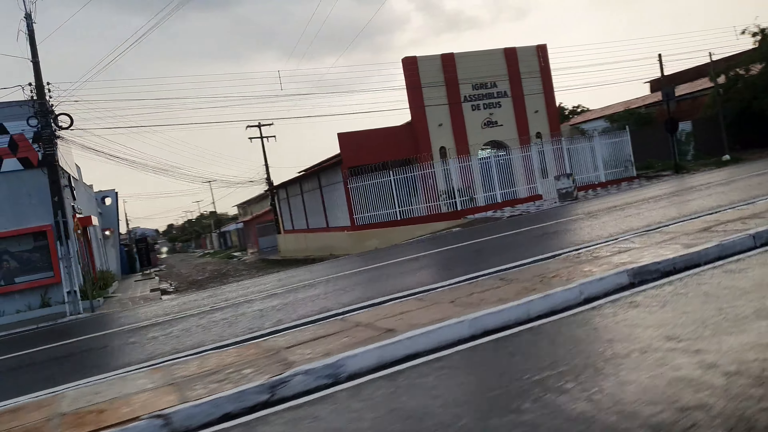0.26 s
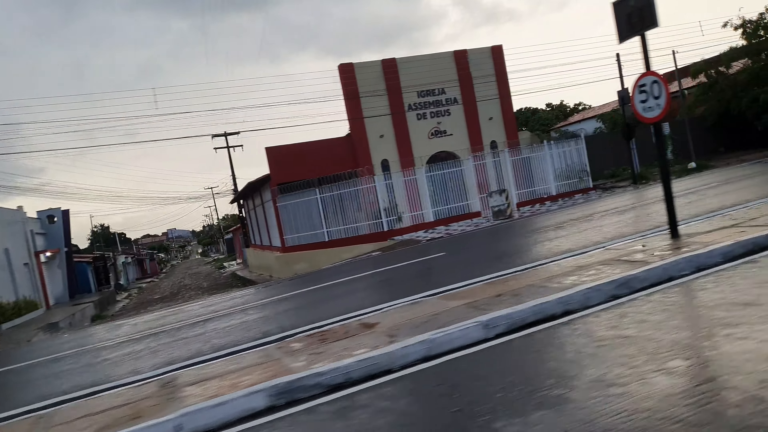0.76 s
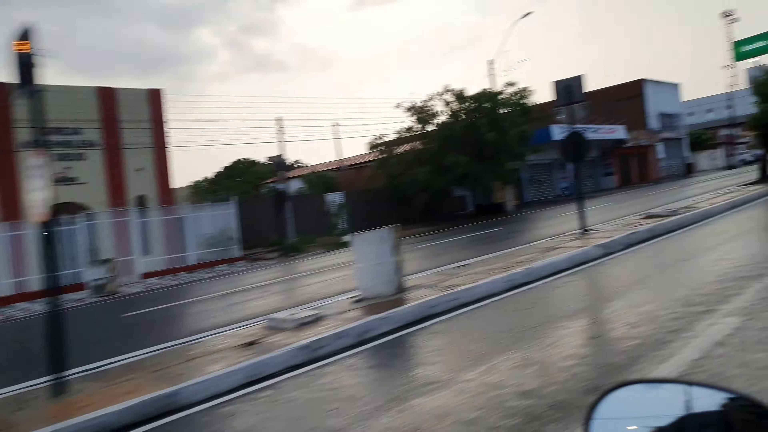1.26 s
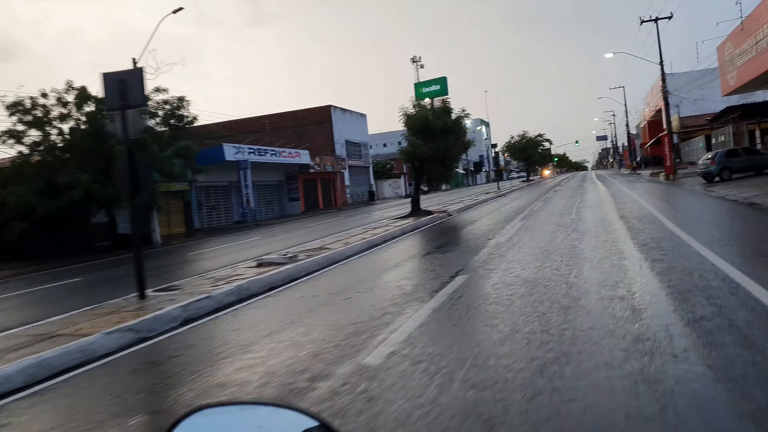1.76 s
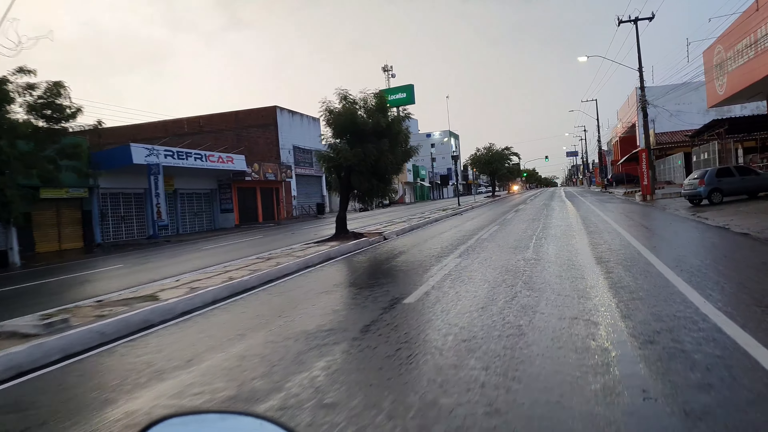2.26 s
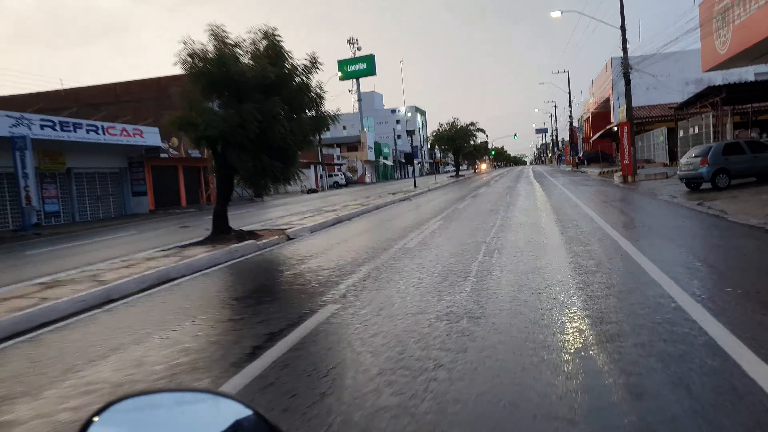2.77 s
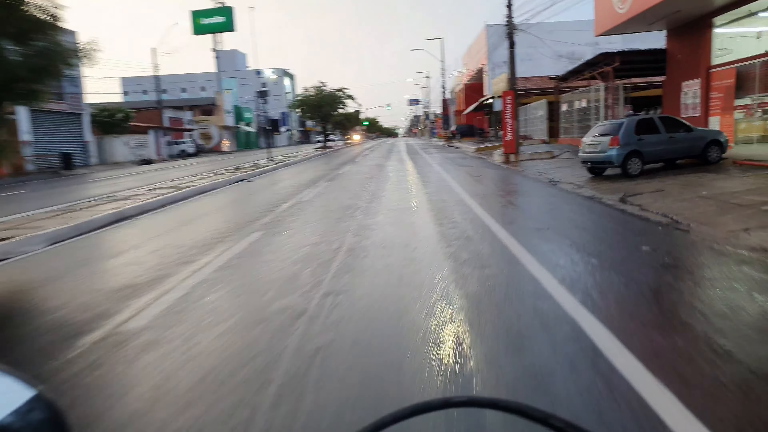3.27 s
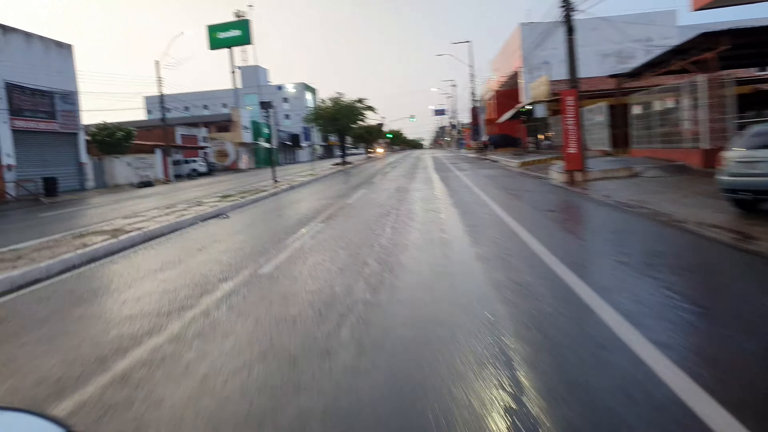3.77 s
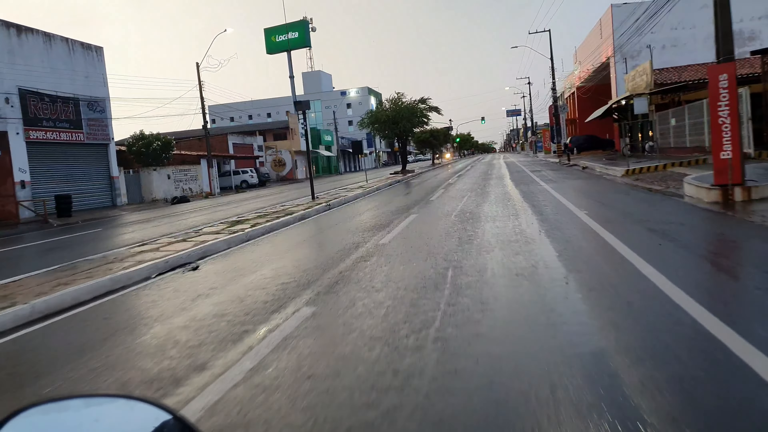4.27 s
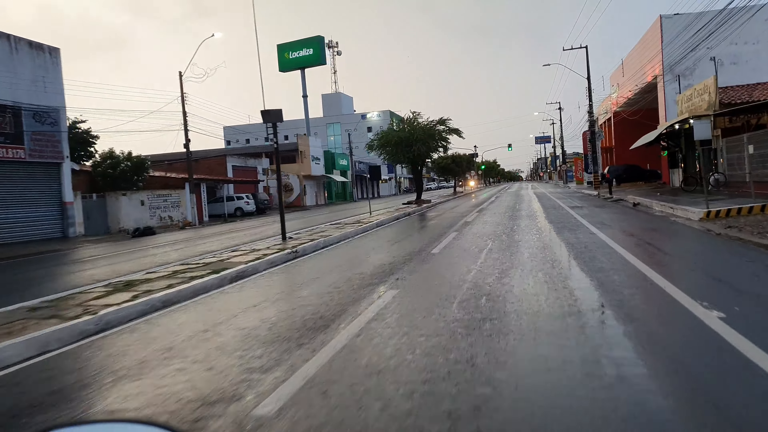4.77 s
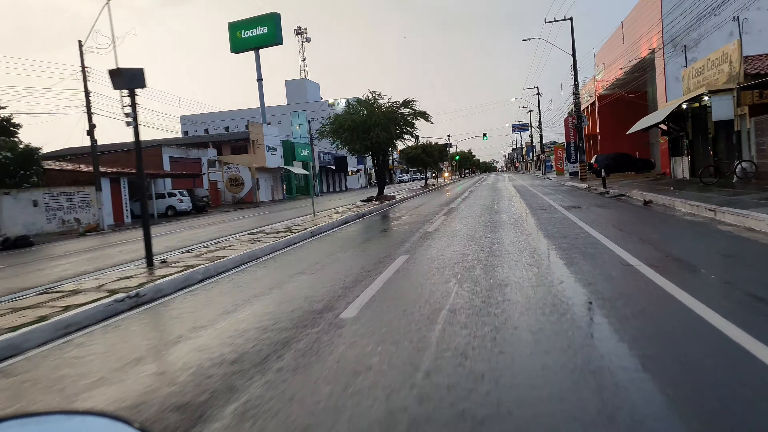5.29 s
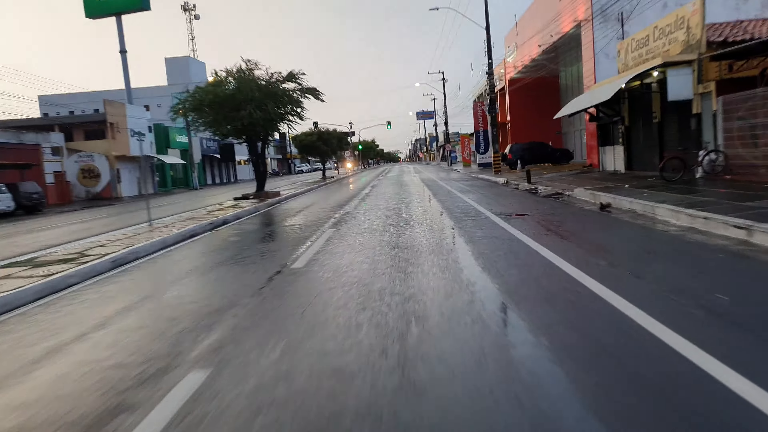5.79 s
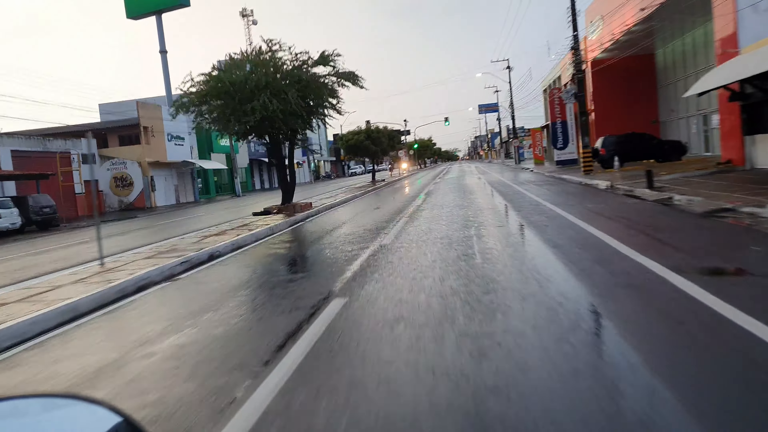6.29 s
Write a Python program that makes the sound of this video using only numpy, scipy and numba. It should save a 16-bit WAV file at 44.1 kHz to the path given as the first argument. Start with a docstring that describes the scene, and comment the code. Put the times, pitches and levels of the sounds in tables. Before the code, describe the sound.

Wind blows directly on a phone microphone during a motorcycle ride outdoors. Airy roar and muted hissing of wet tyres continue throughout, pulsing slightly with the single-cylinder engine, beneath deep uneven rumbling. A quiet smooth hum glides up as speed builds. Buffeting grows stronger, breaking into a burst of popping crackles past halfway, easing briefly, then returning rougher in the final second, with small drop ticks scattered among it.

```python
"""On a wet street, a phone rides on a single-cylinder motorcycle that slowly gains speed.
Right at the microphone port, wind noise rumbles and flutters, pressure swings buffet it and spiky bursts pop.
Humps of filtered noise make the rush of air, tyres and spray; most climb clearly with speed.
The chain hums as a gliding sine, high noise clatters faintly at each firing, stray drops tick on the phone."""
import sys
import numpy as np
from scipy import signal
from scipy.fft import rfft, irfft
from scipy.io import wavfile
from scipy.ndimage import uniform_filter1d, minimum_filter1d
from numba import njit

SR = 44100
rng = np.random.default_rng(int(sys.argv[2]) if len(sys.argv) > 2 else 0)


def put_to_file(sound):
    """Save the sound as 16-bit audio at rate SR, in the file named by the first command-line argument."""
    columns = np.atleast_2d(sound).T  # one column per channel
    safe = np.clip(columns, -1, 1)
    whole_steps = np.round(safe * 32767)
    wavfile.write(sys.argv[1], SR, whole_steps.astype(np.int16))


N = 288414

# Wind on the port between buffets: [t/s, level/dB, deep rumble's extra level/dB]
WIND = [(0, -29, 7), (.3, -25.5, -8), (.45, -30.5, 5), (.53, -31.5, -4), (.7, -29.5, -6), (.95, -26, -4),
        (1.35, -27.5, -4), (1.52, -26, -8), (1.7, -30, 10), (1.87, -30.5, -3), (2.0, -28.5, 7),
        (2.2, -25, -6.5), (2.5, -30, 3), (2.75, -22, -4), (2.9, -28.5, 2), (3.3, -19.5, 3), (3.7, -19.5, 3),
        (4.1, -24.5, -2), (4.33, -24.5, 5), (4.5, -23.5, -1), (4.75, -24, 5), (4.93, -26.5, 2),
        (5.08, -22.5, -5), (5.3, -22, 4), (5.8, -22, 2), (6.2, -21, -9), (6.54, -16, 5)]
# Extra level of the flutter over what the wind alone gives: [t/s, level/dB]
FLUTTER = [(0, -4), (.45, 1.5), (.8, 1.5), (1.0, -0.5), (1.18, -1), (1.27, 7), (1.45, 1.5), (1.58, -1.5),
           (2.0, 1), (2.8, 0), (3.3, -1), (4.0, 1.5), (4.6, -3.5), (5.0, 2), (5.5, -1.5), (5.9, 4),
           (6.3, 0), (6.54, -6.5)]
# Humps of deep rumble, upper rumble and flutter, before wind() retunes them: [f/Hz, width/Hz, level/dB]
EDDY_HUMPS = [
    [(60.8, 20, 0)],
    [(85.6, 32, -0.5), (125.3, 58, -0.5)],
    [(163.7, 131, -0.5), (269.6, 192, -8)],
]
# Level of those three eddy sizes against the wind: [level/dB]
EDDY_DB = [-4, 1, -3]
# Share of the wind's swings in dB that each size takes: [share]
EDDY_FOLLOWS = [0.54, 1.0, 0.52]
# Road speed as the chain sings it, climbing faster after the second point: [t/s, chain mesh f/Hz]
CHAIN = [(0, 253), (1.3, 256), (6.54, 303)]
# Rush of air and spray, before their small gusts: [t/s, air level/dB, spray level/dB]
RUSH = [(0, -31.5, -49), (.25, -33, -47.5), (.5, -33.5, -48), (.95, -32, -46.5), (1.2, -31, -46.5),
        (1.35, -29, -45.5), (1.48, -31.5, -46.5), (1.69, -31.5, -48.5), (2.23, -31.5, -47.5),
        (2.76, -31, -48.5), (3.06, -29.5, -47), (3.3, -31, -48.5), (3.6, -31, -50.5), (4.13, -33, -50),
        (4.48, -33, -48.5), (4.86, -31.5, -47.5), (5.67, -32, -48.5), (5.9, -31.5, -49.5),
        (6.54, -32.5, -49)]
# Humps of the rush at the starting speed: [f/Hz, width/Hz, level/dB]
LOW_HUMPS = [(400.6, 238, -1.5), (556, 216, -3)]
MIDDLE_HUMPS = [(997, 302, 0.25), (1257, 320, -1.4)]
TYRE_HUMPS = [(1500, 590, -4), (1880, 570, -2), (2203, 420, -6)]
SPRAY_HUMPS = [(2840, 1210, 8), (3576, 1170, 7), (4220, 640, -12), (6260, 910, -16)]
# Faint high hiss of the valve gear: [t/s, level/dB, depth of its throb]
VALVE = [(0, -67.5, 0.93), (.5, -71, 0.32), (.75, -69, .5), (1.05, -67.5, 0.49), (1.4, -69, 0.44),
         (1.68, -69.5, 0.46), (1.76, -70.5, .4), (1.9, -71, 0.31), (2.4, -70, 0.43), (2.8, -71.5, 0.55),
         (3.1, -70.5, 0.47), (3.55, -73.5, 0.45), (4.3, -74, 0.31), (4.75, -71, 0.52), (5.3, -71, 0.49),
         (5.9, -72, 0.49), (6.54, -73.5, 0.58)]
# Colour of that hiss: [f/Hz, relative level per Hz/dB]
VALVE_COLOUR = [(6400, -20), (7000, -6), (8200, -2.5), (9500, -2.5), (10500, -1), (11200, -2), (12200, 0),
                (13500, -1), (14500, -5.5), (15700, -10)]
# Slow heave of the air under the rumble: [t/s, level/dB]
HEAVE = [(0, -32), (.35, -36), (.6, -35), (.9, -39), (1.2, -38), (1.4, -22), (1.7, -28.5), (2.1, -31),
         (2.55, -21.5), (2.85, -29), (3.15, -20), (3.35, -29), (3.75, -23), (4.1, -32), (4.55, -20.5),
         (4.8, -30), (5.05, -22), (5.3, -27), (5.6, -26), (5.85, -20.5), (6.1, -20.5), (6.54, -21.5)]
# Hump of the heave, before heave() retunes it: [f/Hz, width/Hz, level/dB]
HEAVE_HUMPS = [(40.9, 23, 0)]
# Buffets, single large eddies that thump the port: [t/s, level/dB, f/Hz, half length/s before clipping]
BUFFETS = [(0.107, -24, 80, 0.035), (0.122, -25, 49, 0.015), (0.154, -29, 76, 0.035),
           (0.22, -24.5, 70.4, 0.032), (0.294, -25.0, 98, 0.035), (0.375, -23.5, 121, 0.015),
           (0.442, -25.0, 69, 0.046), (0.609, -15.5, 79.5, 0.0073), (0.807, -18, 75.6, 0.015),
           (0.905, -25.0, 65, 0.032), (1.261, -24, 113, 0.023), (1.34, -17.5, 75, 0.015),
           (1.413, -17, 131, 0.01), (1.412, -19, 75, 0.012), (1.461, -15, 75, 0.0098),
           (1.595, -14.5, 58, 0.029), (1.665, -19, 70.5, 0.02), (1.923, -19, 53, 0.023),
           (2.05, -17.5, 75, 0.039), (2.158, -22, 61.5, 0.031), (2.465, -16.5, 57.4, 0.021),
           (2.582, -15.5, 57, 0.031), (2.658, -17, 93, 0.017), (2.659, -15.5, 61, 0.029),
           (2.816, -23, 53, 0.017), (2.966, -19.0, 56.6, 0.026), (3.202, -16, 85, 0.023),
           (3.278, -16.0, 92, 0.016), (3.315, -20.5, 65, 0.035), (3.381, -14.5, 76, 0.023),
           (3.429, -14.5, 92, 0.012), (3.509, -13.5, 76.4, 0.018), (3.64, -20, 65.6, 0.042),
           (3.757, -12, 61, 0.011), (3.763, -13, 99, 0.023), (3.802, -23, 49, 0.039),
           (3.912, -15.5, 92, 0.017), (4.098, -16.5, 75, 0.025), (4.173, -18.5, 80, 0.021),
           (4.211, -17, 70, 0.048), (4.226, -17.5, 122.5, 0.013), (4.506, -21, 49, 0.02),
           (4.534, -20.5, 75, 0.023), (4.615, -16.5, 53, 0.024), (4.67, -15, 61, 0.0098),
           (4.738, -23, 92, 0.018), (4.805, -14.5, 62, 0.017), (5.016, -18, 57.5, 0.035),
           (5.022, -16, 114, 0.019), (5.157, -17.5, 52.5, 0.026), (5.273, -16.0, 69.4, 0.022),
           (5.395, -16.5, 78.6, 0.035), (5.446, -14.5, 75, 0.021), (5.499, -18, 61, 0.017),
           (5.648, -13.5, 98, 0.015), (5.743, -11, 86.6, 0.019), (5.875, -12, 85.5, 0.017),
           (6.126, -16, 70, 0.017), (6.161, -15, 105, 0.019), (6.242, -14.5, 98, 0.017),
           (6.372, -9.5, 86, 0.016), (6.429, -21, 61, 0.016), (6.515, -14.5, 115, 0.026)]
# Drops that tick on the phone: [t/s, peak level/dB, centre f/Hz]
DROPS = [(0.126, -55, 12000), (1.528, -44, 4000), (1.818, -56, 9000), (2.150, -53, 7000),
         (2.176, -52, 13100), (2.249, -47, 4000), (2.932, -45, 4000), (3.072, -38, 3800),
         (3.319, -48, 4000), (3.397, -41, 4000), (3.551, -49, 3500), (3.645, -33, 3600),
         (3.736, -28.5, 2800), (3.737, -37, 3880), (4.081, -40, 4000), (4.838, -50, 12300),
         (4.838, -58, 9000), (4.838, -33, 4000), (4.938, -38, 4000), (5.042, -59, 12500),
         (5.043, -38, 4200), (5.123, -41, 4000), (5.448, -41, 4000), (5.700, -55, 12900),
         (5.967, -58, 7500), (5.966, -38, 4300), (5.985, -47, 5600), (6.058, -59, 12000),
         (6.095, -56, 7000), (6.225, -59, 10000), (6.412, -36, 3400)]
# Gust pops on the port: [t/s of the sharp spike, level/dB, centre f/Hz, upward spread/octaves, decay/s]
POPS = [(2.664, -30, 980, 0.41, 0.013), (3.2617, -24.5, 790, 0.66, 0.0036), (3.438, -25, 900, 0.61, 0.0028),
        (3.4946, -19, 750, 0.36, 0.0029), (3.5062, -27, 1000, .8, .002), (3.51, -32, 1100, .8, 0.0016),
        (3.525, -23, 694, 0.27, .003), (3.537, -33, 800, 0.52, .003), (3.5746, -24.5, 1200, .71, 0.0017),
        (3.59, -21.5, 690, 0.37, .003), (3.604, -28, 900, 0.56, .003), (3.621, -28, 800, .6, 0.0022),
        (3.6384, -28, 1090, 0.45, .002), (3.6469, -24, 1150, 0.55, .002), (3.651, -24, 900, 0.38, .003),
        (3.66, -31, 900, .47, 0.0023), (3.6654, -31, 1200, 0.4, 0.0017), (3.6732, -29, 1100, 0.44, 0.0022),
        (3.6762, -18, 920, .36, 0.0032), (3.679, -19, 950, 0.3, 0.0022), (3.6828, -19, 1000, 0.3, .0025),
        (3.6873, -23, 1200, .5, .002), (3.69, -26, 1250, 0.6, .002), (3.698, -22, 654, 0.41, 0.0043),
        (3.719, -22.5, 1150, .4, 0.0018), (3.7406, -32, 900, 0.47, 0.0032),
        (3.7476, -20.5, 840, 0.72, 0.0042), (3.766, -37, 750, 0.55, .003), (3.7725, -29, 900, 0.45, .002),
        (3.779, -31, 1100, 0.79, 0.0024), (3.7997, -25, 1050, .63, 0.0037),
        (3.9087, -28, 980, 0.37, 0.0036), (3.952, -27, 895, 0.35, 0.0065), (4.052, -29, 900, 0.91, .003),
        (4.177, -28, 900, 0.36, 0.0048), (4.2052, -25.5, 950, 0.63, 0.0074),
        (4.23, -30.5, 890, .36, 0.0061), (5.168, -28, 850, .5, 0.0032), (5.343, -24, 900, 0.68, 0.0032),
        (5.473, -27, 850, 0.54, .003), (5.53, -27, 800, 0.71, 0.0034), (5.608, -29, 1010, 0.51, 0.0027),
        (5.6123, -27, 1090, 0.72, .003), (5.699, -35, 910, .6, 0.0035), (5.7225, -19, 650, 0.69, .002),
        (5.7254, -21, 946, 1, 0.0026), (5.729, -27.5, 1400, 0.85, 0.0045),
        (5.7645, -22.5, 650, 0.4, 0.0029), (5.7674, -16, 696, 0.52, 0.0022),
        (5.7717, -22.5, 803, 0.82, 0.005), (5.7765, -21, 895, 0.99, 0.0022),
        (5.7794, -25, 850, 0.72, 0.0022), (5.807, -31, 890, 0.72, 0.0035), (5.8116, -25, 1200, .9, 0.0025),
        (5.817, -25, 1200, 0.77, .002), (5.8205, -25.5, 1200, 0.75, 0.0043), (5.828, -33, 1000, 0.79, .003),
        (5.855, -31, 900, 1, .003), (5.88, -30, 1000, 0.78, .003), (5.912, -21, 620, 0.39, 0.0038),
        (5.9165, -31, 753, 1.1, 0.0036), (5.9217, -30, 850, 0.46, 0.0018), (5.93, -28, 990, 0.8, .003),
        (5.9365, -28, 950, .6, 0.0018), (5.939, -23, 950, .6, .002), (5.9464, -25, 945, 0.61, 0.0032),
        (5.95, -22, 800, 0.38, 0.0022), (5.9545, -18, 700, 0.57, 0.0022),
        (5.9573, -20.5, 1000, 0.57, 0.0015), (5.96, -25, 1000, 0.58, .002), (5.9677, -21, 1300, 1, 0.0014),
        (5.9717, -33, 1200, 0.87, .002), (5.9795, -28, 900, 0.55, .002), (5.9856, -23, 1200, 0.94, 0.0072),
        (5.9904, -19, 900, 0.73, 0.0014), (6.0, -30, 894, .7, 0.0023), (6.02, -21, 650, 0.26, 0.0059),
        (6.054, -32, 950, 0.88, 0.0052), (6.0925, -32, 1000, 1.1, 0.0037), (6.0964, -23, 1400, 1, 0.0024),
        (6.101, -21.5, 650, 0.42, 0.0054), (6.108, -28, 750, .5, .002), (6.125, -42, 2500, 0.14, 0.0039),
        (6.141, -42, 2500, .15, .004), (6.159, -38, 2500, .15, .0036), (6.195, -39, 2500, .15, .004),
        (6.2165, -20, 1200, 1.06, 0.0016), (6.2184, -18, 890, 0.59, .002), (6.227, -27, 990, 0.86, .002),
        (6.229, -20.5, 950, 0.99, 0.0038), (6.271, -34, 700, 0.85, 0.0045), (6.317, -24, 650, 0.56, 0.0034),
        (6.352, -25.5, 753, .75, 0.004), (6.406, -38, 2490, .15, 0.0022), (6.415, -33, 603, 0.39, .003),
        (6.442, -38, 2500, 0.12, .0046), (6.4606, -25, 650, 0.7, 0.0017),
        (6.4627, -17.5, 750, 0.81, 0.0022), (6.4687, -35, 900, 0.68, .002), (6.487, -28, 800, 0.43, 0.004),
        (6.5105, -17, 620, 0.63, 0.0031), (6.514, -19, 890, 1, 0.0032)]
# Swells of crackle where the gust tears over the port: [t/s, level/dB, half length/s]
TEARS = [(3.508, -47, 0.048), (3.6, -43, 0.035), (3.68, -32.5, 0.021), (3.77, -40, 0.04),
         (3.92, -37.5, 0.052), (4.21, -45.5, 0.02), (5.61, -36, 0.04), (5.73, -38.5, 0.013),
         (5.774, -45, 0.016), (5.83, -37.5, 0.029), (5.93, -39, .03), (5.98, -31, 0.03), (6.06, -40, .02),
         (6.1, -38, .025), (6.225, -39, 0.022), (6.34, -39, .04), (6.48, -42, 0.032)]

GUST_DB, GUSTS_PER_S = 2, 15  # random unrest of each eddy size
BUFFET_FLUTTER_DB = -17  # flutter on each buffet, against the buffet
MESHES_PER_FIRING, HUM_DB = 10.56, -38.5
MIDDLE_START_DB, MIDDLE_DRIFT_DB_PER_S = -6.5, -0.15  # middle air humps against the low ones
TYRE_START_DB, TYRE_DRIFT_DB_PER_S = 7.35, -0.53  # tyre hiss against the spray
DROP_WIDTH = 0.45  # bandwidth of each filter on a tick, against its centre
SNAP = 45  # sharp spike of a pop, added to the crackle around it
POP_RISE = 0.35  # build-up time of a pop against its decay
TEAR_SPIKES_PER_S = 900
PORT_TOP_HZ, TOP_HZ = 6000, 15700  # upper limits of the port cavity and of the microphone


def undb(db):
    """Gain of a level in dB."""
    return 10 ** (np.asarray(db) / 20)


def unit(x):
    """Scale to an rms of 1."""
    return x / np.sqrt(np.mean(x ** 2))


def curves(table):
    """Columns of a table, joined by straight lines over every sample."""
    s, *columns = np.transpose(table)
    return [np.interp(np.arange(N) / SR, s, column) for column in columns]


@njit
def svf(x, hz, width):
    """State-variable band-pass with a moving centre, gain 1 there."""
    y, band, low = np.empty(len(x)), 0., 0.
    for i in range(len(x)):
        g, damping = np.tan(np.pi * hz[i] / SR), width[i] / hz[i]
        v = (band + g * (x[i] - low)) / (1 + g * (g + damping))
        band = 2 * v - band
        low = low + 2 * g * v
        y[i] = damping * v
    return y


def steep(x, hz, width):
    """The band-pass twice over, for steeper skirts."""
    hz, width = hz + np.zeros(len(x)), width + np.zeros(len(x))
    return svf(svf(x, hz, width), hz, width)


def walk(rate):
    """Random levels held 1 / rate s and slewed twice; spread near 1."""
    hold = int(SR / rate)
    steps = np.repeat(rng.standard_normal(N // hold + 1), hold)
    return 0.84 * uniform_filter1d(uniform_filter1d(steps, hold), hold)[:N]


def humps(table, shift, flicker_db):
    """Turbulence as noise in broad bands; every hump flickers alone."""
    out = 0
    for hz, width, db in table:
        band = unit(steep(rng.standard_normal(N), hz * shift, width * shift))
        out = out + band * undb(db + flicker_db * walk(30))
    return unit(out)


def near_buffet(s):
    """Samples within 0.15 s of a buffet."""
    return slice(max(int((s - 0.15) * SR), 0), int((s + 0.15) * SR))


def wind_levels():
    """Level of each eddy size: the wind with its unrest; flutter also rides on each buffet."""
    t = np.arange(N) / SR
    wind_db, deep_db = curves(WIND)
    mean_db = wind_db.mean()
    power = []
    for db, follows in zip(EDDY_DB, EDDY_FOLLOWS):
        swing_db = follows * (wind_db - mean_db) + GUST_DB * walk(GUSTS_PER_S)
        power.append(undb(db + mean_db + swing_db) ** 2)
    deep, upper, flutter = power
    deep *= undb(deep_db) ** 2
    flutter *= undb(curves(FLUTTER)[0]) ** 2
    for s, db, _, length in BUFFETS:
        near = near_buffet(s)
        swell = np.exp(-((t[near] - s) / np.clip(length, 0.006, 0.045)) ** 2)
        flutter[near] += undb(db + BUFFET_FLUTTER_DB) ** 2 * swell
    return np.sqrt([deep, upper, flutter])


def wind(levels):
    """Large eddies rumble, smaller ones flutter above; each size gusts in its own time."""
    out = 0
    for level, eddy in zip(levels, EDDY_HUMPS):
        swirl = humps(eddy, 0.95, flicker_db=0.5)
        # eddies pass one after another, so their strength keeps to the gust
        strength = np.sqrt(uniform_filter1d(swirl ** 2, int(0.06 * SR)) + 0.028)
        out = out + level * unit(swirl / strength ** 0.7)
    return out


def crackle(level):
    """Small dull pops at random; they come thicker and harder the stronger the gust."""
    gust = uniform_filter1d(level * undb(17.5), int(0.3 * SR))
    when, sign, size = rng.random((N, 3)).T
    spikes = (when < 160 * gust ** 2 / SR) * np.sign(sign - 0.5) * undb(9 * size)
    puff = rng.standard_normal(256) * np.exp(-np.arange(256) / SR / 0.0021)
    puffs = signal.fftconvolve(spikes, unit(puff))[:N]
    dull = signal.butter(4, 2600, fs=SR, output="sos")
    return undb(-35.0) * gust * signal.sosfilt(dull, steep(puffs, 610.0, 1600.0))


def engine():
    """The chain hums at its mesh rate; also gives speed against the start and a throb at each firing."""
    (mesh_hz,) = curves(CHAIN)
    turns = np.cumsum(mesh_hz) / SR
    hum = np.sqrt(2) * np.sin(2 * np.pi * turns) * undb(HUM_DB)
    cycle = (turns / MESHES_PER_FIRING + 0.34) % 1
    # gas and valves swell at each firing, then die away
    throb = cycle / 0.3 * np.exp(1 - cycle / 0.3)
    return hum, mesh_hz / mesh_hz[0], throb


def follow_level(base_db, start_db, drift_db_per_s):
    """A level that follows another at a slowly changing offset."""
    return base_db + start_db + drift_db_per_s * np.arange(N) / SR


def rush(speed, throb):
    """Air and spray: humps climb with speed, and small gusts shake them all together."""
    low_db, spray_db = curves(RUSH)
    middle_db = follow_level(low_db, MIDDLE_START_DB, MIDDLE_DRIFT_DB_PER_S)
    tyre_db = follow_level(spray_db, TYRE_START_DB, TYRE_DRIFT_DB_PER_S)
    gusts = walk(45) + 0.7 * walk(150)
    low = humps(LOW_HUMPS, speed ** 0.81, flicker_db=0.8) * undb(low_db + gusts)
    middle = humps(MIDDLE_HUMPS, speed ** 0.41, flicker_db=0.5) * undb(middle_db + gusts)
    # tyre hiss and spray also throb with the firings
    tyre = unit((1 + 0.5 * throb) * humps(TYRE_HUMPS, speed ** 0.71, flicker_db=0.0))
    tyre = tyre * undb(tyre_db + 0.5 * gusts + 0.53 * walk(9))
    spray = unit((1 + 0.51 * throb) * humps(SPRAY_HUMPS, speed ** 0.048, flicker_db=0.5))
    spray = spray * undb(spray_db + 0.87 * gusts)
    return low + middle + tyre + spray


def clatter(throb):
    """Faint high hiss of the valve gear, louder at each firing; its bands swell and flicker each alone."""
    hz, db = np.transpose(VALVE_COLOUR)
    level_db, depth = curves(VALVE)
    f = np.arange(N // 2 + 1) * SR / N + 1
    colour = undb(np.interp(np.log(f), np.log(hz), db)) * (f > hz[0])
    hiss = 0
    for centre in np.arange(6400, 16400, 1600):
        flicker_db = 1.8 * walk(300) + 1.2 * walk(25) + 1.1 * walk(3.7)
        grain = rng.standard_normal(N) * undb(flicker_db)
        # neighbouring bands cross over at equal power
        band = np.clip(1 - np.abs(f - centre) / 1600, 0, 1) ** 0.5
        hiss = hiss + irfft(rfft(grain) * colour * band, N)
    firing = 1 + depth * (throb - throb.mean())
    return undb(level_db + 0.62 * walk(60)) * firing * unit(hiss)


def heave():
    """The deepest, slowest swaying of the air, as one low noise hump."""
    return humps(HEAVE_HUMPS, 0.99, flicker_db=4.5) * undb(curves(HEAVE)[0])


def buffets():
    """Each buffet is a short swing of pressure that swells and fades."""
    out, t = np.zeros(N), np.arange(N) / SR
    for (s, db, hz, length), turn in zip(BUFFETS, rng.random(len(BUFFETS))):
        near = near_buffet(s)
        dt = t[near] - s
        swing = np.sqrt(2) * np.cos(2 * np.pi * (hz * dt + turn))
        swell = np.exp(-0.5 * (dt / np.clip(length, 0.006, 0.045)) ** 2)
        out[near] += undb(db) * swing * swell
    return out


def drops():
    """A drop is a thin, short tick; the duller ones land in the port, the bright ones on the case."""
    out, t = np.zeros((2, N + 512)), np.arange(512) / SR
    splashes = rng.standard_normal((len(DROPS), 512))
    for (s, db, hz), splash in zip(DROPS, splashes):
        tick = splash * t * np.exp(-t / 0.0005)
        for _ in range(2):
            tick = steep(tick, hz, DROP_WIDTH * hz)
        place, at = int(hz > PORT_TOP_HZ), int(s * SR)
        out[place, at:at + 512] += undb(db) * tick / np.abs(tick).max()
    return out[:, :N]


def pops():
    """Each pop is a short crackle of pressure spikes around one sharp one, coloured around its centre."""
    lead, size = 512, 4096  # samples before the sharp spike, and in all
    out, t = np.zeros(N + size), (np.arange(size) - lead) / SR
    f = np.arange(size // 2 + 1) * SR / size + 1
    air = rng.standard_normal((len(POPS), size))
    spikes = air * np.abs(air) ** 2.0  # a few strong spikes among many weak ones
    spikes[:, lead] += SNAP * np.sign(air[:, lead])  # the sharp spike pushes or sucks
    for (s, db, hz, octaves, length), puff in zip(POPS, spikes):
        # the thump reaches further down than the hiss reaches up
        spread = octaves * np.where(f < hz, 1.6, 1)
        colour = np.exp(-0.5 * (np.log2(f / hz) / spread) ** 2) / (1 + (f / 3500) ** 6)
        shape = np.exp(-(t / (length * np.where(t < 0, POP_RISE, 1))) ** 2)
        burst = irfft(rfft(puff) * colour) * shape
        strength = np.sqrt(np.sum(burst ** 2) / np.sum(shape ** 2))
        at = int(s * SR) - lead
        out[at:at + size] += undb(db) * burst / strength
    return out[:N]


def tearing():
    """Gusts tear over the port: dense small spikes of mixed size, dull and broad, that swell and fade."""
    t = np.arange(N) / SR
    power = sum(undb(db) ** 2 * np.exp(-((t - s) / length) ** 2) for s, db, length in TEARS)
    when, sign, size = rng.random((N, 3)).T
    spikes = (when < TEAR_SPIKES_PER_S / SR) * np.sign(sign - 0.5) * undb(14 * size)
    dull = signal.butter(4, 2000, fs=SR, output="sos")
    return np.sqrt(power) * unit(signal.sosfilt(dull, steep(spikes, 610.0, 1700.0)))


def scene():
    """Sound in the port is muffled by its cavity; the thin high sounds come through the case."""
    levels = wind_levels()
    hum, speed, throb = engine()
    drops_in_port, drops_on_case = drops()
    air = wind(levels) + crackle(levels[1]) + heave() + buffets() + pops() + tearing()
    in_port = air + rush(speed, throb) + hum + drops_in_port
    cavity = signal.butter(8, PORT_TOP_HZ, fs=SR, output="sos")
    return (signal.sosfilt(cavity, in_port) + clatter(throb) + drops_on_case)[None]


def record(dry):
    """The phone's microphone cuts the deepest bass, holds down the loudest gusts and cuts the top."""
    dry = signal.sosfilt(signal.butter(4, 40, "high", fs=SR, output="sos"), dry)
    span = int(0.02 * SR)
    peak = -minimum_filter1d(-np.abs(dry), span)  # running maximum
    gain = uniform_filter1d(np.minimum(1, 0.58 / (peak + 1e-9)) ** 0.8, span)
    top_cut = signal.ellip(12, 0.2, 80, TOP_HZ, fs=SR, output="sos")
    return signal.sosfilt(top_cut, dry * gain)


dry = scene()
out = record(dry)
put_to_file(out)
```